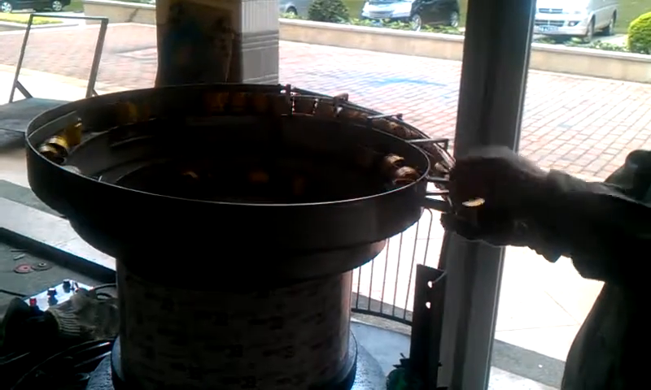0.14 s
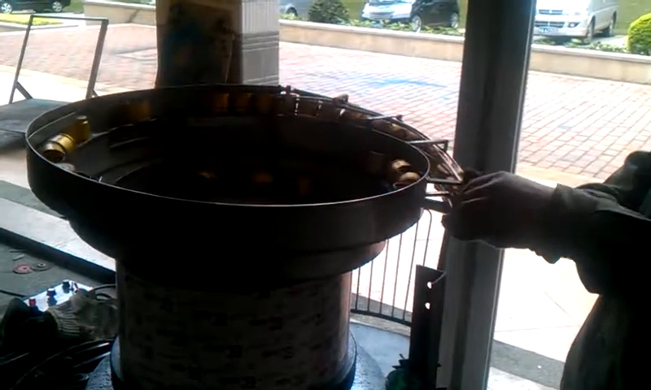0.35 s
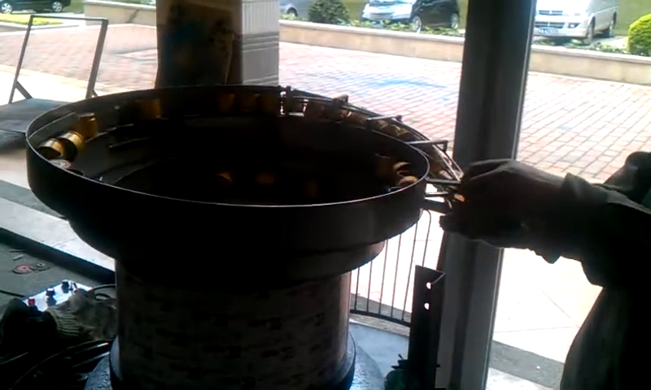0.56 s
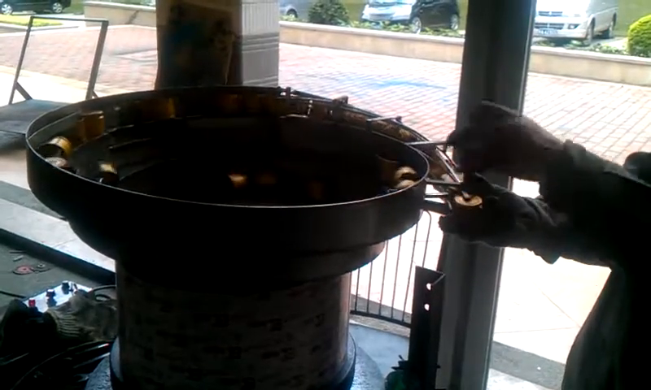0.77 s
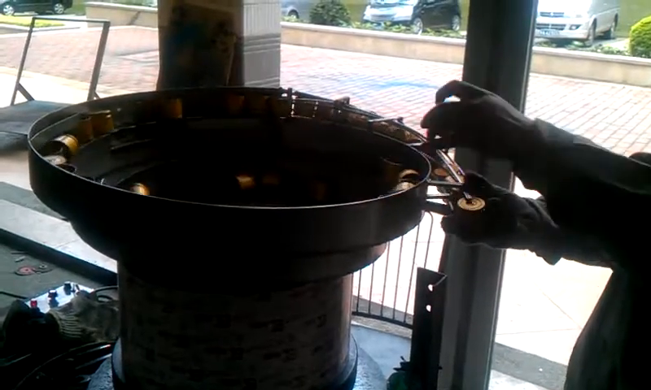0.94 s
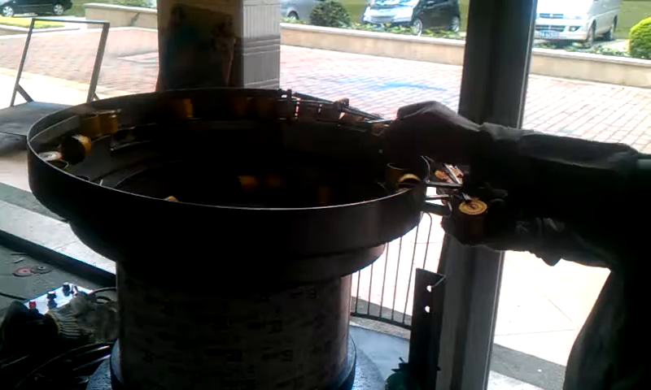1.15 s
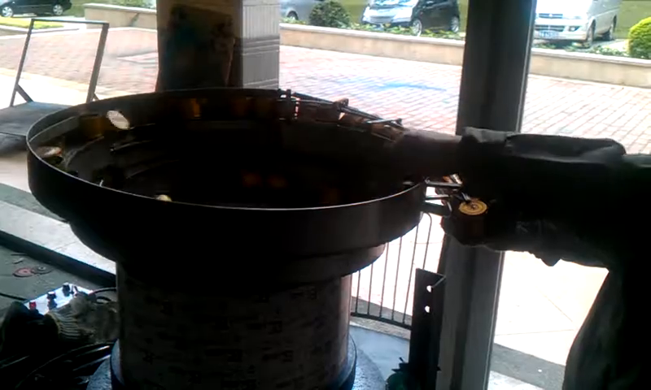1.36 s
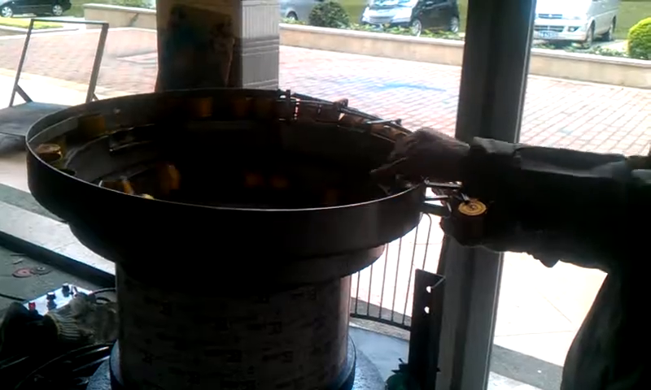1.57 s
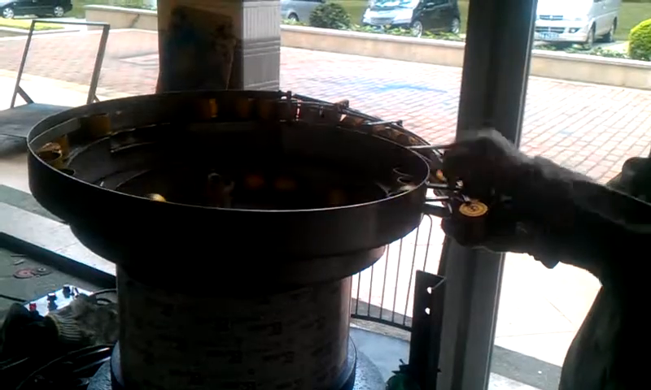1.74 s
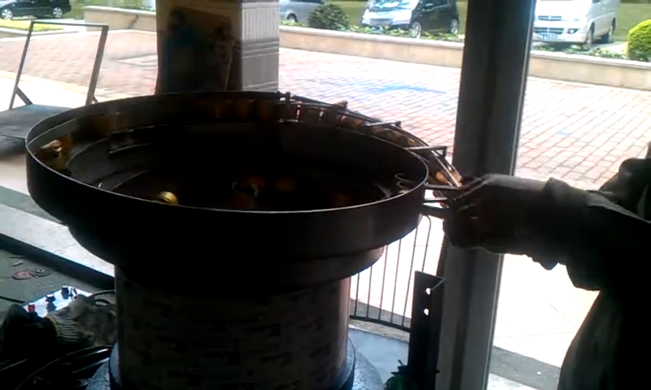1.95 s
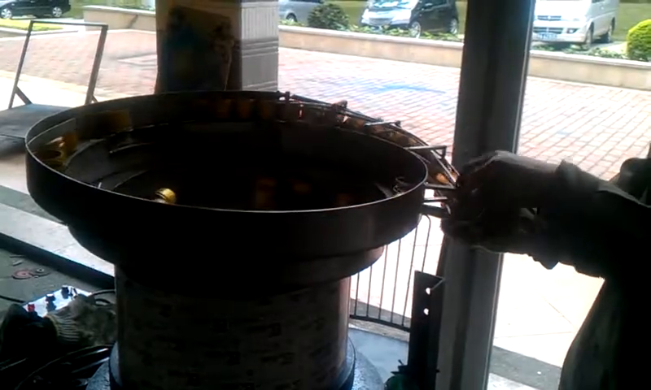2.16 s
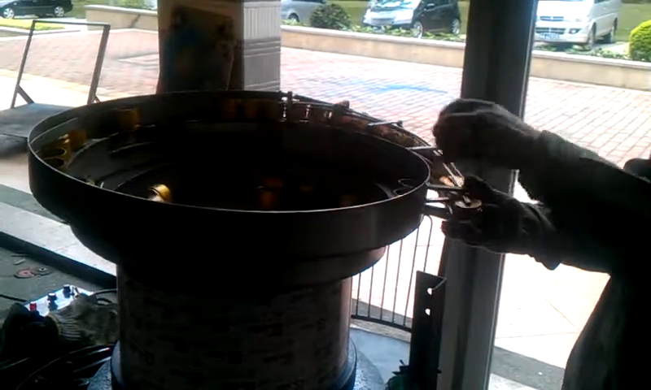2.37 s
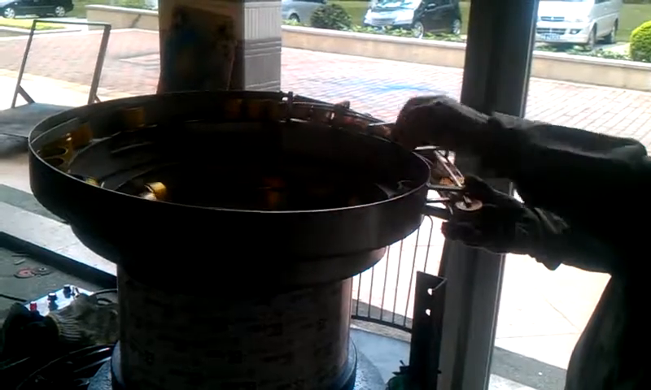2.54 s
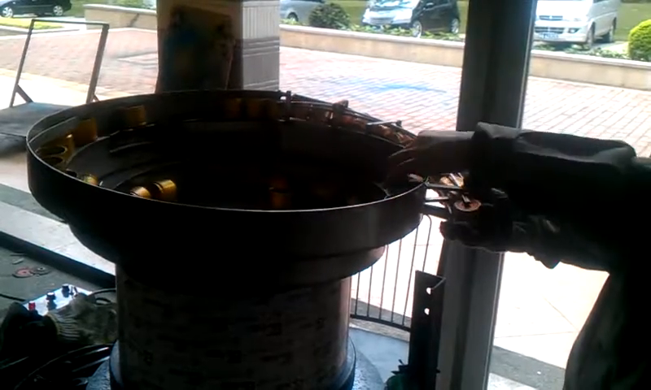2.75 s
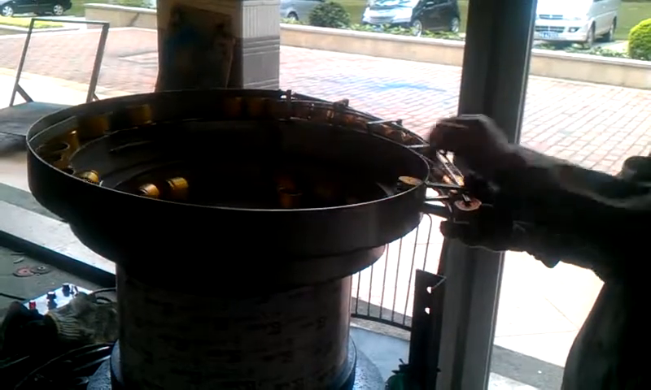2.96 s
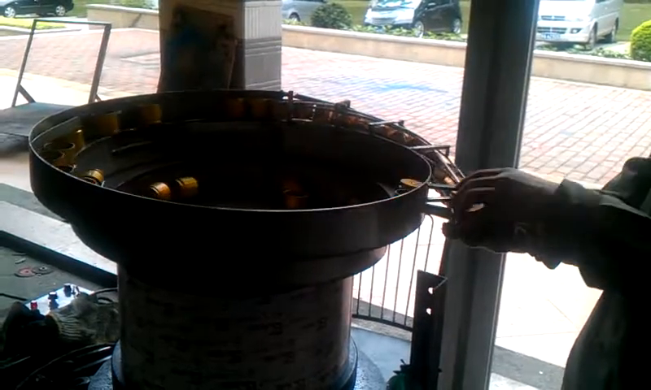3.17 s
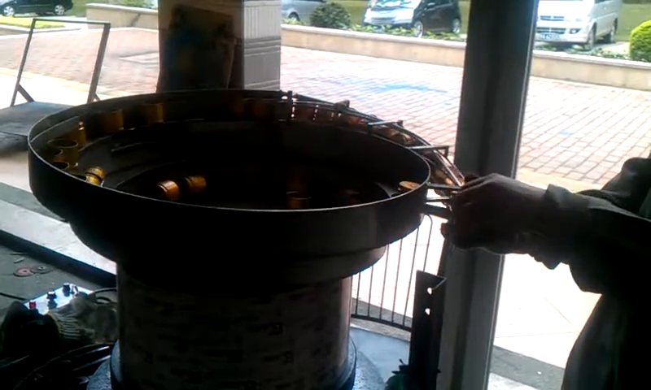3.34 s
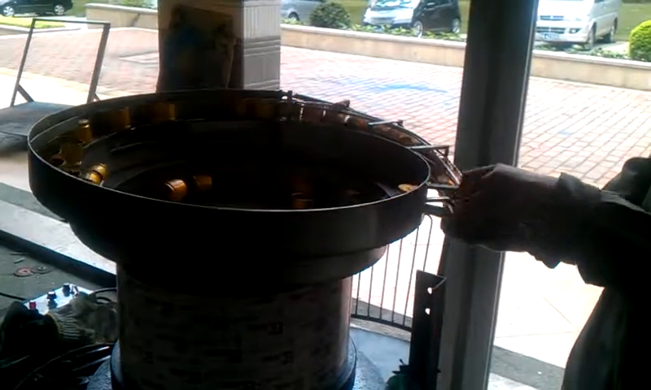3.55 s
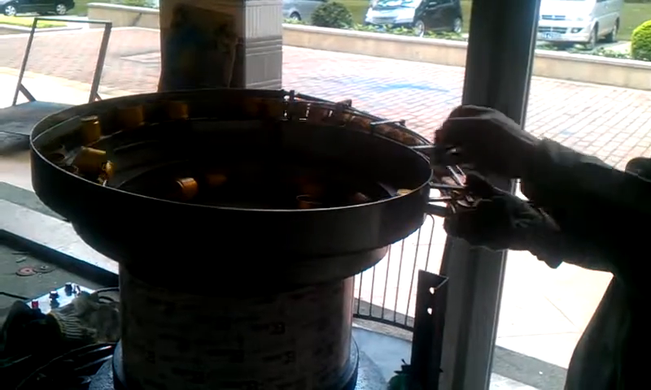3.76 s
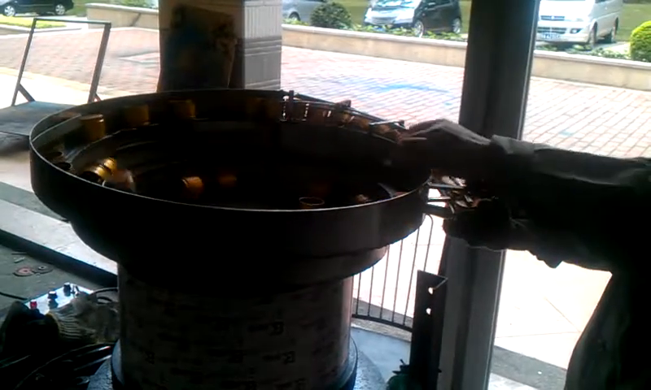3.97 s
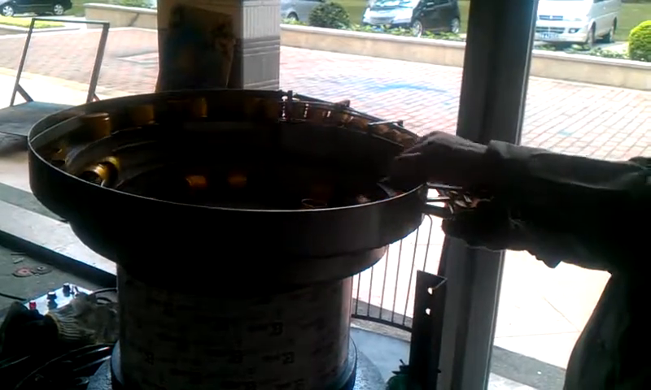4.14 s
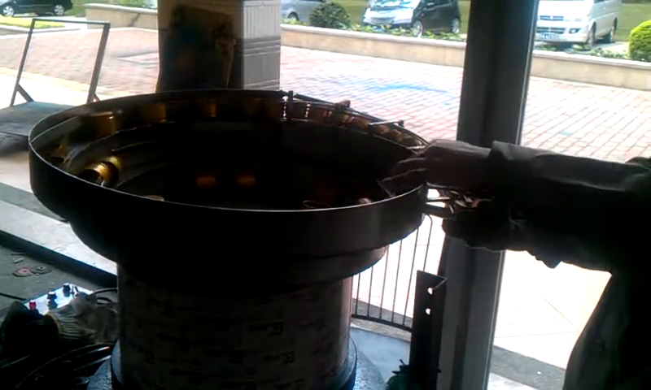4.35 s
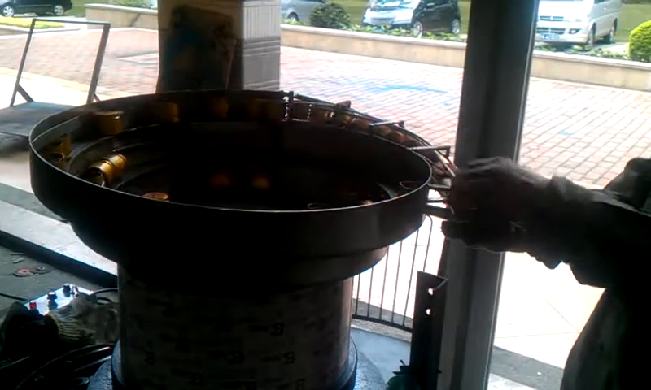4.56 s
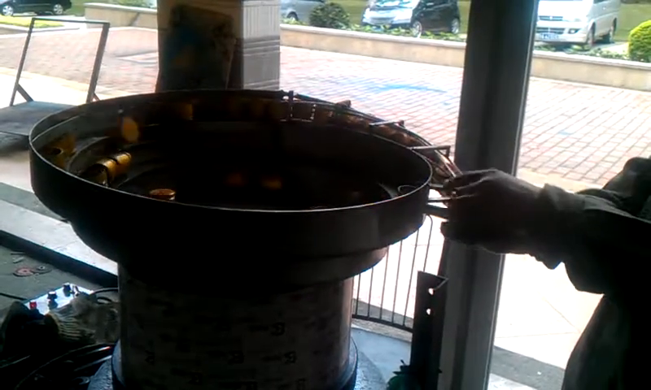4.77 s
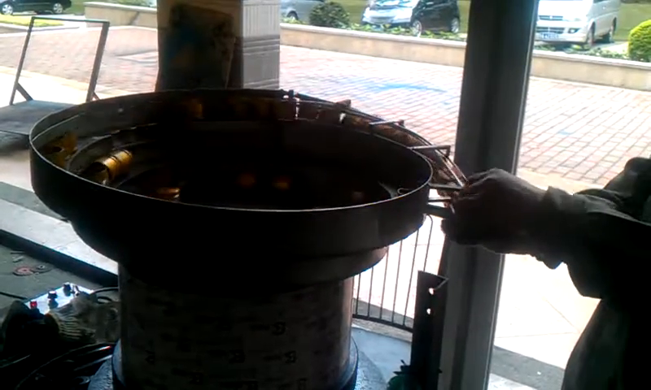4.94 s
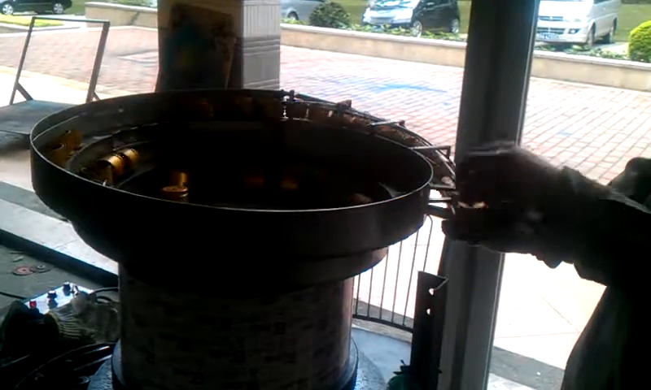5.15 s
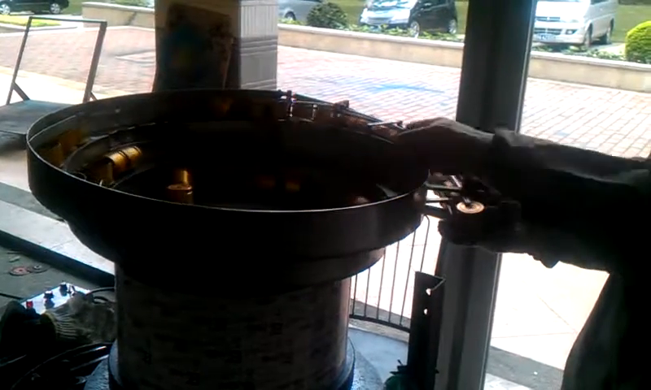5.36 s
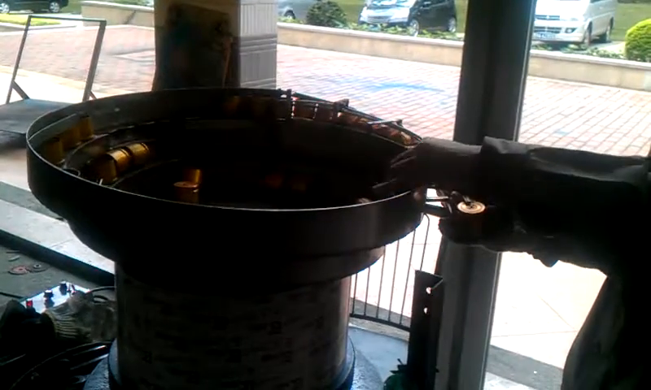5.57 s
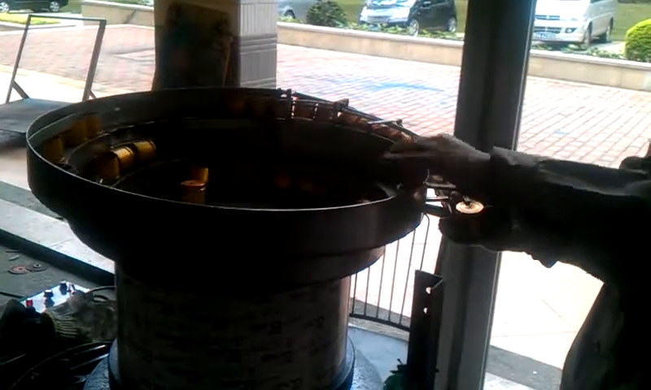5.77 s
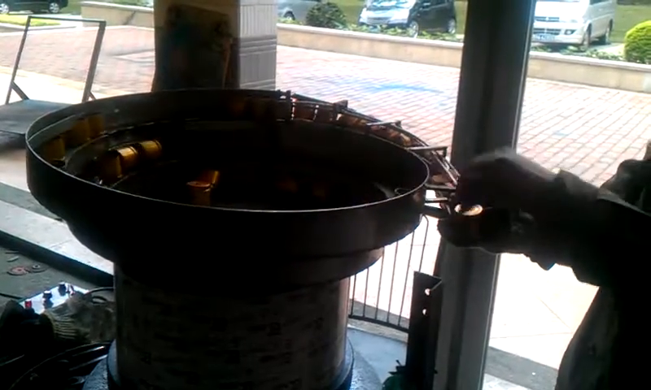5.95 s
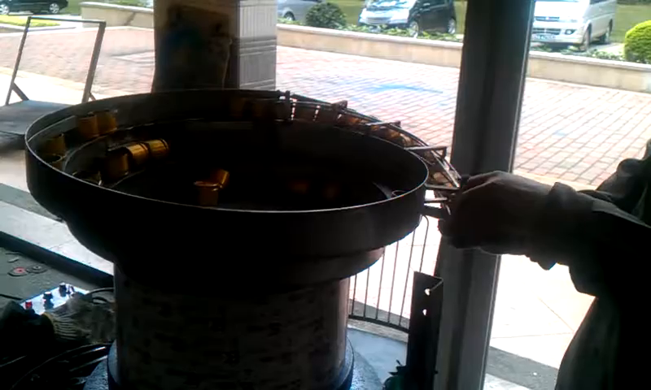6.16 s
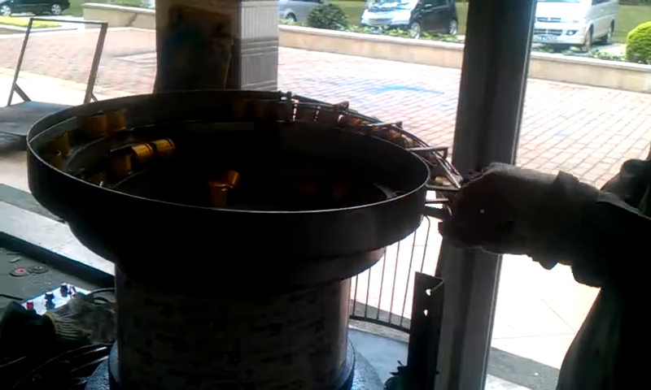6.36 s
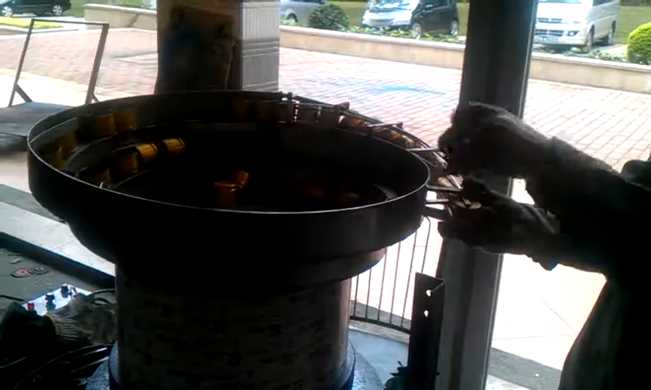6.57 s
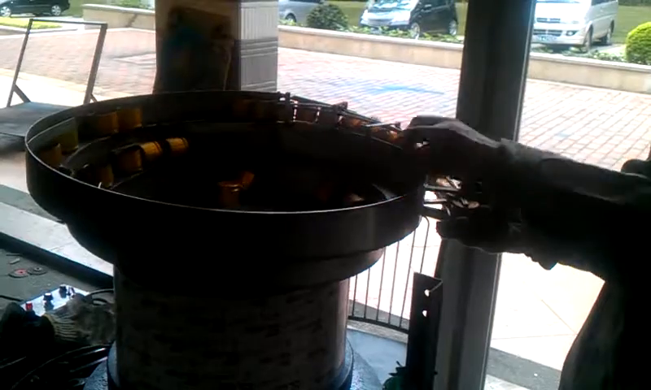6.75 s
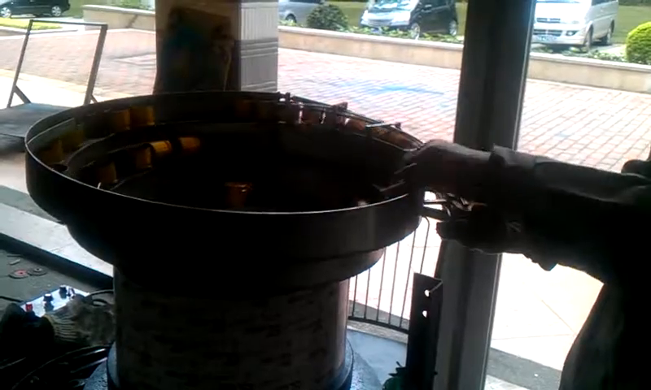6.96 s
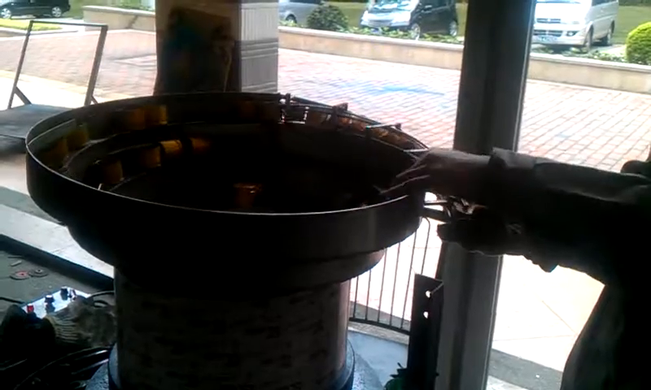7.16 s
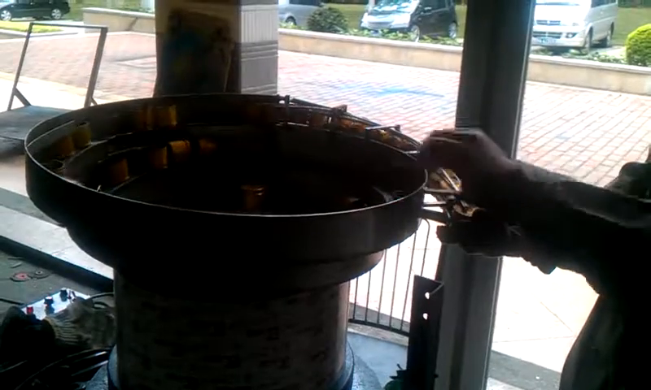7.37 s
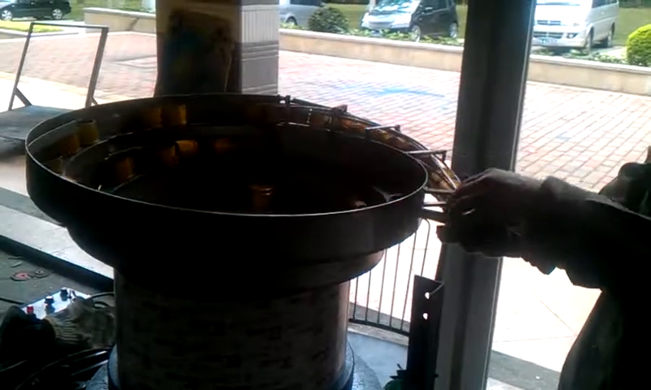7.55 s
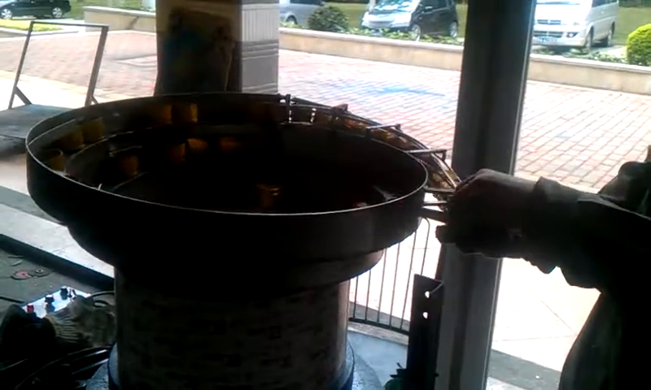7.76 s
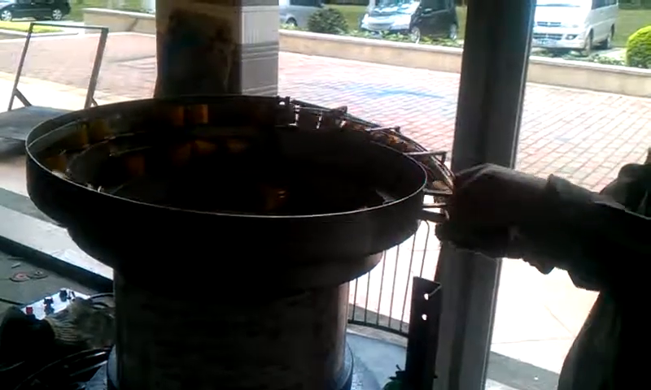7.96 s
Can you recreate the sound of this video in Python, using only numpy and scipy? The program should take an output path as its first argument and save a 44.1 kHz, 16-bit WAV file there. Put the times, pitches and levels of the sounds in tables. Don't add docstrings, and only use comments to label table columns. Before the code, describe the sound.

Dense metallic din from small brass parts hopping around a shaking steel bowl in a workshop, very near the microphone. Sharp high ringing dominates, with rougher track rattle and faint hums swelling underneath. One firm knock stands out early on, others are nearly buried. The level stays loud, flattened and gritty until it abruptly cuts out.

```python
import sys
import numpy as np
from scipy import signal
from scipy.fft import rfft, irfft, dct
from scipy.io import wavfile
from scipy.ndimage import uniform_filter1d

SR = 44100
rng = np.random.default_rng(int(sys.argv[2]) if len(sys.argv) > 2 else 0)


def store_pcm(level_fs):
    pcm = np.round(np.clip(level_fs, -1, 1) * 32767).astype(np.int16)
    wavfile.write(sys.argv[1], SR, np.atleast_2d(pcm).T)


def makeup_ratio(level_db):
    decades = np.asarray(level_db, float) / 20
    return 10 ** decades


N = 353221

FAMILY_HZ = [1200, 3300, 5200, 6800, 8300]
FAMILY_DRIFT_DB = [.8, .5, .5, .05, .7]
BOWL_HZ = [860, 1210, 1310, 1524, 1660, 2090, 2258, 2668, 3010, 3250, 3492, 3967, 4520]
# width_hz, level_db
BOWL_RINGS = [(49, -16), (71.4, -16.5), (22.4, -26), (22.2, -14), (21, -15), (43.9, -13), (35, -11),
              (61, -9), (40.8, -9), (118.4, -13), (59.7, -9), (65, -13.5), (65.8, -10)]
PARTS_HZ = [4820, 4950, 5272, 5750, 6180, 6370, 6560, 6680, 6795, 6900, 7054, 7220, 7480, 7820, 8115, 8335,
            11150, 11820]
# width_hz, level_db
PARTS_RINGS = [(60.2, -6), (79.7, -4), (50.8, -1), (49.4, -6), (90, -2), (103.6, -2), (50.4, -4), (35, -2),
               (54.9, 0), (35.1, -3), (45.1, 1), (29.7, -3), (80.7, -7.5), (65, -7), (89, -3.5),
               (109.3, -4), (140, -19), (130, -26)]
# start_s, length_s, rise_db
TRACK_SWELLS = [
    (.05, 0.41, 2.5),
    (1.0, 0.57, 2.5),
    (5.5, .35, 1.5),
    (6.2, 0.38, 1.5),
]
# pitch_hz, level_db (per Hz)
SCRAPE_COLOUR = [(30, -51.5), (250, -26), (1000, -17), (2500, -12), (4300, -6), (5000, -2.5), (7000, -2),
                 (8500, -6), (9300, -11.5), (11000, -20), (13000, -38.5), (16000, -37.5)]
# start_s, length_s, rise_db
YARD_SWELLS = [
    (2.7, .8, 2),
    (4.4, .6, 3),
    (5.4, 1.2, 2.5),
    (7.0, 1., 6),
]
# start_s, length_s, rise_db
WALL_SWELLS = [
    (.65, .45, 4),
    (1.15, 0.88, 8),
    (3.15, 0.66, 5.5),
    (3.85, .75, 7.5),
    (4.65, 0.27, 6),
    (5.0, .5, 3),
    (6.6, .45, 3),
    (7.3, .4, 8),
]
# start_s, length_s, rise_db
RAIL_SWELLS = [
    (1.0, .55, 10.5),
    (3.7, .3, 6),
    (4.0, .45, 3),
    (4.45, 0.54, 7),
    (5.9, .2, 5),
    (6.6, 0.28, 8),
    (6.9, 0.73, 3),
]
# start_s, peak_db, pitch_hz, fade_s (time to fall 60 dB)
TOSSES = [
    (1.111, -26, 890, 0.089),
    (1.775, -15.5, 857, 0.11),
    (2.185, -20, 1180, 0.08),
    (2.903, -28.5, 1216, 0.074),
    (4.516, -28.5, 925, 0.08),
    (4.956, -32, 1236, 0.08),
]
# pitch_hz, step_db
ROUNDING_STEPS = [(200, -45), (3000, -32), (8000, -21), (10000, -14.7), (11500, -15.6), (13000, -16.3),
                  (14300, -16.9), (15000, -18), (15700, -18)]
# time_s, from_hz, to_hz
NOISE_SWAPS = [(0.138, 4690, 5640), (0.138, 8290, 9650), (0.324, 9000, 10310), (0.649, 4650, 6270),
               (0.649, 7600, 11020), (0.974, 14530, 15830), (0.719, 4650, 6310), (0.974, 5190, 6870),
               (0.974, 7620, 10340), (1.09, 4260, 5150), (1.09, 8270, 9650), (1.253, 4260, 6270),
               (1.81, 11740, 13110), (1.973, 5190, 7580), (2.043, 6910, 8270), (2.089, 9670, 11050),
               (2.135, 5230, 6890), (3.761, 5190, 6290), (4.62, 7600, 8960), (4.829, 8960, 10310),
               (4.899, 8960, 10310), (5.781, 6930, 8270), (5.99, 8290, 9630), (6.036, 4290, 6890),
               (1.253, 14380, 15830), (6.269, 5730, 6890), (7.128, 14450, 15830), (7.221, 8290, 9650),
               (7.546, 9020, 10340), (7.546, 12420, 13800)]


def evened(x):
    return x / np.sqrt(np.mean(x ** 2) + 1e-20)


def taps(per_s, spread_db):
    strength = makeup_ratio(spread_db * np.minimum(rng.exponential(1, N), 5))
    sign = rng.choice([-1., 1.], N)
    return evened(strength * sign * (rng.random(N) < per_s / SR))


def ring(x, hz, width_hz):
    b, a = signal.iirpeak(hz, hz / max(width_hz, 5), SR)
    return signal.lfilter(b, a, x)


def swells(rows):
    t = np.arange(N) / SR
    total_db = 0
    for start_s, length_s, rise_db in rows:
        progress = np.clip((t - start_s) / max(length_s, .05), 0, 1)
        total_db = total_db + rise_db * np.sin(np.pi * progress) ** 2
    return total_db


def family_drift():
    bunch_s = .25
    steps = rng.standard_normal((len(FAMILY_DRIFT_DB), 1000))
    t = np.linspace(0, N / SR, steps.shape[1])
    bunch = np.exp(-.5 * ((t - t.mean()) / (bunch_s / 2)) ** 2)
    drifts = []
    for drift_db, row in zip(FAMILY_DRIFT_DB, steps):
        smooth = evened(np.convolve(row, bunch, "same"))
        drifts.append(drift_db * np.interp(np.arange(N) / SR, t, smooth))
    return np.array(drifts)


def rattle(pitches_hz, rings, shake, per_s, spread_db):
    total = np.zeros(N)
    for hz, (width_hz, level_db) in zip(pitches_hz, rings):
        family = np.argmin(abs(np.log(hz / np.array(FAMILY_HZ))))
        total += makeup_ratio(level_db + shake[family]) * ring(taps(per_s, spread_db), hz, width_hz)
    return total


def scrape(shake):
    patchy_db = 1.1
    hz, t, ticks = signal.stft(taps(9000, 2.44), SR, nperseg=512)
    colour_hz, colour_db = np.transpose(SCRAPE_COLOUR)
    level_db = np.interp(np.log(hz + 1), np.log(colour_hz), colour_db)
    patches = uniform_filter1d(rng.standard_normal(ticks.shape), 5, 0)
    patches = evened(uniform_filter1d(patches, 12, 1))
    share = np.array([np.interp(hz, FAMILY_HZ, one) for one in np.eye(len(FAMILY_HZ))])
    at = np.minimum((t * SR).astype(int), N - 1)
    field_db = level_db[:, None] + share.T @ shake[:, at] + patchy_db * patches
    return signal.istft(ticks * makeup_ratio(field_db), SR, nperseg=512)[1][:N]


def hum():
    b, a = signal.butter(2, 70, fs=SR)
    yard = evened(signal.lfilter(b, a, rng.standard_normal(N)))
    wall = evened(ring(taps(3000, 1.0), 552, 8))
    rails = evened(ring(taps(3000, 0.69), 1955, 50))
    yard *= makeup_ratio(-44 + swells(YARD_SWELLS))
    wall *= makeup_ratio(-41.5 + swells(WALL_SWELLS))
    rails *= makeup_ratio(-37 + swells(RAIL_SWELLS))
    return yard + wall + rails


def tosses():
    out = np.zeros(N)
    t = np.arange(8000) / SR
    overtones = [(1, 1), (1.12, 0.65), (3.05, .45), (3.55, .45)]
    for start_s, peak_db, hz, fade_s in TOSSES:
        knock = sum(g * np.sin(2 * np.pi * k * hz * t) for k, g in overtones)
        fade = makeup_ratio(peak_db - 60 * t / max(fade_s, .02))
        onset = 1 - np.exp(-t / 0.0026)
        place = out[round(start_s * SR):][:len(t)]
        place += (fade * onset * knock)[:len(place)]
    return out


def scene():
    stroke = np.sin(2 * np.pi * 50 * np.arange(N) / SR)
    stroke_db = np.array([[.7], [.5], [.15], [0], [0]])
    clump_share = np.array([[.3], [1], [0], [0], [0]])
    shake = family_drift() + stroke_db * stroke + clump_share * swells(TRACK_SWELLS)
    steel = rattle(BOWL_HZ, BOWL_RINGS, shake, 700, 2.8)
    brass = rattle(PARTS_HZ, PARTS_RINGS, shake, 1500, 2.2)
    din = makeup_ratio(3) * steel + makeup_ratio(2.5) * brass + scrape(shake)
    mix = makeup_ratio(-5.5) * evened(din) + hum() + makeup_ratio(6.5) * tosses()
    return np.tile(mix, (2, 1))


def overload(x):
    return makeup_ratio(-16.5) * np.tanh((x / makeup_ratio(-16.0)) * 1.3)


def watery_rounding(x):
    hop, offset = 1024, 539
    top_hz, wobble_db = 15725, .3
    window = np.sin(np.pi * (np.arange(2 * hop) + .5) / (2 * hop))
    padded = np.pad(x, (2 * hop - offset, 3 * hop))
    blocks = np.lib.stride_tricks.sliding_window_view(padded, 2 * hop)[::hop] * window
    a, b, c, d = np.split(blocks, 4, 1)
    lines = dct(np.c_[-c[:, ::-1] - d, a - b[:, ::-1]], 4, norm="ortho")
    hz = (np.arange(hop) + .5) * SR / 2 / hop
    wobble = np.repeat(rng.standard_normal((len(lines), 32)), hop // 32, 1)
    step = makeup_ratio(np.interp(hz, *np.transpose(ROUNDING_STEPS)) + wobble_db * wobble)
    whole = np.floor((abs(lines) / step) ** .75 + .4)
    rounded = np.sign(lines) * whole ** (4 / 3) * step
    h, k = np.split(dct(rounded * (hz < top_hz), 4, norm="ortho"), 2, 1)
    blocks = np.c_[k, -k[:, ::-1], -h[:, ::-1], -h] * window
    return (blocks[1:, :hop] + blocks[:-1, hop:]).ravel()[hop - offset:][:N]


def noise_swaps(x):
    out = x.copy()
    hz = np.fft.rfftfreq(2048, 1 / SR)
    window = signal.windows.kaiser_bessel_derived(2048, 4 * np.pi)
    for time_s, low_hz, high_hz in NOISE_SWAPS:
        middle = round(time_s * SR)
        block = slice(middle - 1024, middle + 1024)
        inside = (hz > low_hz) & (hz < high_hz)
        band = irfft(rfft(x[:, block]) * inside)
        noise = irfft(rfft(rng.standard_normal(band.shape)) * inside)
        out[:, block] += window * evened(noise) * band.std() - window ** 2 * band
    return out


def band_limit(x):
    return signal.sosfilt(signal.butter(12, 15830, fs=SR, output="sos"), x)


def record(dry):
    squared = overload(dry[0])
    b, a = signal.butter(1, 120, "high", fs=SR)
    thin = signal.lfilter(b, a, squared)
    b, a = signal.butter(1, 18300, fs=SR)
    soft = signal.lfilter(b, a, thin)
    both = np.tile(watery_rounding(soft), (2, 1))
    running = np.arange(N) < 7.6284 * SR
    return band_limit(noise_swaps(both) * running)


dry = scene()
out = record(dry)
store_pcm(out)
```